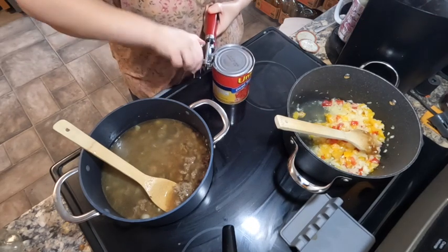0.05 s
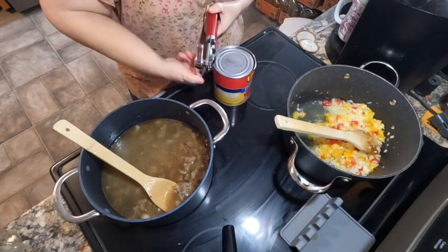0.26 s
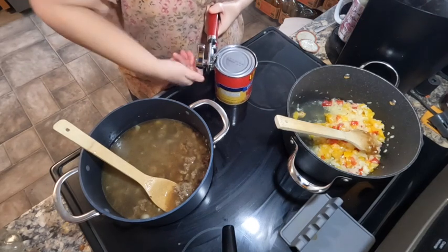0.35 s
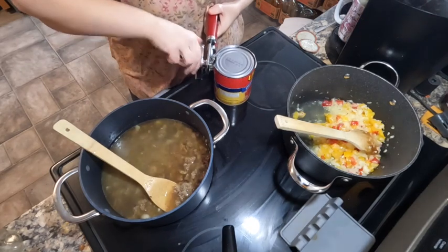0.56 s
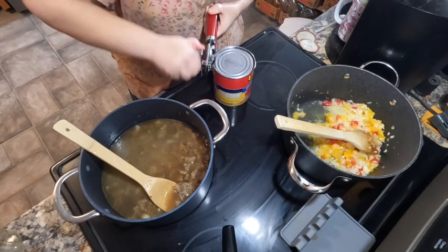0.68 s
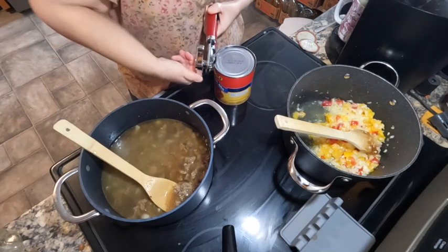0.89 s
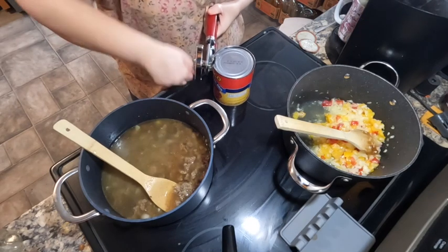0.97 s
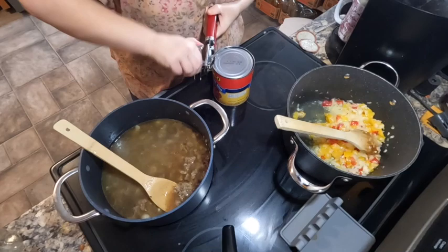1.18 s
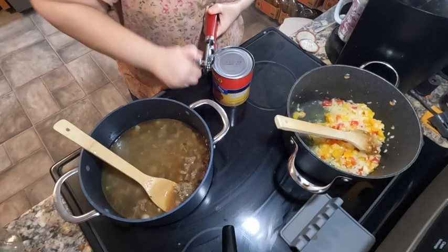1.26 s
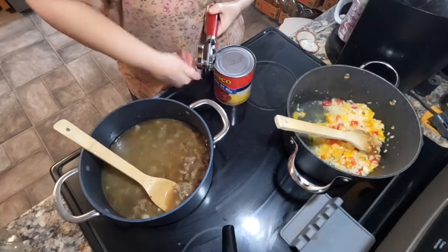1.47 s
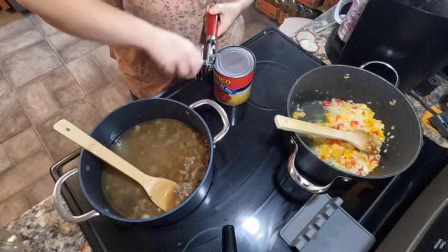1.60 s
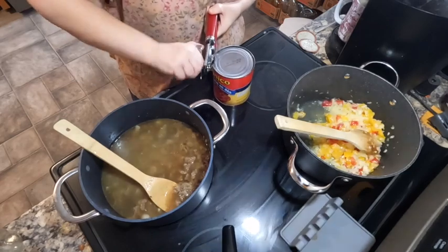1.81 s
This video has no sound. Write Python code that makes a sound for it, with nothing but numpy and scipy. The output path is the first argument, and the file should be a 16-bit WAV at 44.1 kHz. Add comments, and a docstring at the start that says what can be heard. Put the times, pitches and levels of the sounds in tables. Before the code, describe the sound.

A hand-cranked can opener bites round a large full tin on a glass hob: three short metallic grinds with sharp clicks and squeaks, over soft sizzle and low rumble, heard close in a small kitchen.

```python
"""A pan sizzles softly over a low kitchen rumble, then a hand-cranked can opener clicks and snaps.
It bites round the lid of a full tin can on a glass hob in three half turns.
Uneven slips, made as random jolts and hiss, shake the can body, ring the lid and grind at the wheel.
The lid squeaks as wavering sine tones; sizzle and rumble are filtered noise, with a short room tail."""
import sys
import numpy as np
from scipy import signal
from scipy.fft import rfft, irfft, next_fast_len
from scipy.io import wavfile
from scipy.ndimage import uniform_filter1d

SR = 44100
rng = np.random.default_rng(int(sys.argv[2]) if len(sys.argv) > 2 else 0)


def master(y):
    """Save y as 16-bit WAV."""
    cut = np.clip(np.atleast_2d(y).T, -1, 1)
    pcm = np.round(cut * 32767)  # scale
    wavfile.write(sys.argv[1], SR, pcm.astype(np.int16))


N = 81585  # length in samples


def amp(db):
    """Turns decibels into a plain gain."""
    return 10 ** (np.asarray(db) / 20)


def evened(x):
    """Scales a sound to an average (RMS) level of one."""
    return x / np.sqrt(np.mean(x ** 2) + 1e-20)


def read(points, hz):
    """Reads a curve between its points, along a logarithmic pitch scale."""
    point_hz, value = np.transpose(points)
    return np.interp(np.log(hz + 1), np.log(point_hz + 1), value)


def colour(x, points):
    """Filters a sound by a spectrum in dB."""
    size = next_fast_len(2 * x.shape[-1])
    gain = amp(read(points, np.fft.rfftfreq(size, 1 / SR)))
    return irfft(rfft(x, size) * gain, size)[..., :x.shape[-1]]


def ring(x, modes):
    """Metal struck by x: a sum of sine tones that die away, faster when the mode is wider."""
    t = np.arange(4096) / SR
    tap = np.zeros(4096)
    for hz, width_hz, db in modes:
        strength = amp(db) * np.sqrt(width_hz)
        tap += strength * np.exp(-np.pi * width_hz * t) * np.sin(2 * np.pi * hz * t)
    return signal.oaconvolve(x, tap / np.linalg.norm(tap))[:len(x)]


# spectrum of the sizzle and room air: pitch_hz, density_db (dB per Hz)
AIR_COLOUR = [(59, -66), (100, 2), (244, -10), (362, -20.5), (559, -18.5), (846, -28.5), (1130, -20),
              (1750, -30), (1900, -30.5), (2240, -26), (5580, -28.5), (14200, -55.5)]
# how alike the two sides are: pitch_hz, likeness (0 to 1)
AIR_LIKENESS = [(60, 1), (230, 0.98), (910, 0.76), (3530, 0.57), (13700, 0.9)]
AIR_DB, PATCH_DB = -45, 2.5  # overall level; unevenness of the patches


def air():
    """Sizzle and room air: patchy noise, partly alike on both sides."""
    frames, hz = N // 128 + 5, np.fft.rfftfreq(512, 1 / SR)
    a, b, c, d, patches = rng.standard_normal((frames, 257, 5)).T
    patches = uniform_filter1d(patches, 30, 0)  # smooth across pitch
    patches = evened(uniform_filter1d(patches, 8, 1))  # and across time
    same = np.clip(read(AIR_LIKENESS, hz), -1, 1)[:, None]
    left = a + 1j * b
    right = same * left + np.sqrt(1 - same ** 2) * (c + 1j * d)
    grid = np.array([left, right]) * amp(PATCH_DB * patches)
    noise = signal.istft(grid, nperseg=512, noverlap=384)[1][:, :N]
    return amp(AIR_DB) * evened(colour(noise, AIR_COLOUR))


# low rumble through the hob, midway between the sides: time_s, level_db
RUMBLE_LEVEL = [(0.0, -33.5), (0.086, -46.5), (0.252, -33), (0.276, -17), (0.328, -61), (0.349, -26),
                (0.674, -44.5), (0.782, -28), (1.082, -29.5), (1.122, -36.5), (1.256, -41), (1.458, -24.5),
                (1.484, -28), (1.57, -28.5), (1.606, -37.5), (1.678, -37.5), (1.71, -45), (1.85, -41.5)]
# spectrum of the rumble: pitch_hz, density_db (dB per Hz)
RUMBLE_SPECTRUM = [(8.8, -37), (15, 10), (54, 11), (135, -1.5), (170, -8.5), (220, -23), (265, -66)]


def rumble():
    """Low lumpy shaking through the hob: deep noise that swells and sinks."""
    a, b = rng.standard_normal((2, N))
    x = colour(np.array([a + 0.41 * b, a - 0.069 * b]), RUMBLE_SPECTRUM)
    slow_power = uniform_filter1d((x ** 2).mean(0), 3000)
    x = x / np.sqrt(abs(slow_power) + 1e-12)
    time_s, level_db = np.transpose(RUMBLE_LEVEL)
    side_db = np.array([[-1.], [1.]])  # a little stronger on the right
    return x * amp(np.interp(np.arange(N) / SR, time_s, level_db) + side_db)


# clicks and snaps of the gear and the cutter, with a faint treble spit of the pan among them, before the part
# levels below: # start_s, level_db, thud_db and treble_edge_db (both against level_db), slow_tail_t60_s (time
# to fall 60 dB)
SNAP_LIST = [(0.124, -32.5, 3, -15.5, 0.5), (0.2028, -28.5, 4, -21, 0.11), (0.2364, -42, -19, -23, 0.078),
             (0.253, -18.5, 5, -22, 0.041), (0.2798, -26, -2, -6.5, 0.098), (0.4207, -32, 7, -29, 0.097),
             (0.575, -58, -22.5, -8, 0.07), (0.654, -30.5, 7.5, -37, 0.39), (0.717, -41, 16, -16, 0.073),
             (0.7464, -42.5, 5, -3, 0.11), (0.769, -32.5, 19, -13, 0.13), (0.789, -10.5, -39, -4, 0.039),
             (0.82, -24.5, 11, -10, 0.14), (0.9724, -10.5, 2.5, -18.5, 0.098), (0.9925, -33, 12, -23, 0.21),
             (1.019, -31, 6.5, -28, 0.47), (1.234, -35.5, -1.5, -9.5, 0.094), (1.2418, -47, 17, -11, 0.15),
             (1.297, -35, 1, -13, 0.12), (1.3425, -21.5, -17, -29, 0.06),
             (1.4466, -13.5, -2.5, -20.5, 0.055), (1.493, -21.5, 4, -30, 0.088), (1.704, -58, 7, 10, 0.12)]
# spectra of the crack and of its treble edge: pitch_hz, density_db (dB per Hz)
CRACK_COLOUR = [(260, -44), (450, 2), (824, -4.5), (1170, 2.5), (1460, -6), (2520, -3), (3080, -8),
                (5000, -30), (6500, -26), (11000, -120)]
TICK_COLOUR = [(2650, -29), (4000, 5.5), (4700, -5), (6200, -6.5), (7930, -10), (8610, -23.5),
               (9700, -11.5), (14200, -30)]
# ringing modes of the can body, main lid, upper lid, rim and cutting wheel: pitch_hz, width_hz, level_db
BODY_MODES = [(274.4, 44, 4), (203, 90, -14), (312, 85, -2.5), (428.5, 55, 0.5), (549, 14, -7.5),
              (599.4, 17, -6), (867, 170, -5), (1050, 89, -14)]
LID_MODES = [(1065, 48, -2), (1230, 50, -4), (1295, 29, 9.5), (1330, 27, 0)]
UPPER_LID_MODES = [(1592, 63, 1.5), (1734, 25, 7.5)]
RIM_MODES = [(2096, 18, -5.5), (2567, 28, 2), (2875, 68, 1), (3005, 62, -2.5), (3256, 78, -2.5),
             (3590, 76, -6.5), (3816, 38, -11.5)]
CUTTER_MODES = [(4203, 120, 1.5), (4780, 82, -5), (5187, 70, -2.5), (5650, 94, -14), (6640, 90, -8.5),
                (7770, 66, -17), (9880, 330, -10)]
# the deep bass of the shudder and thud is thinned below about 160 Hz: pitch_hz, gain_db
BASS_CUT_GAIN = [(105, -8.5), (160, -1.5), (400, -0.38)]
CRACK_DB, TICK_DB, THUD_DB, RING_DB, SNAP_CUTTER_DB = -8.5, -5, -8, -14, -18
SNAP_RISE_S, FIRST_T60_S, AFTER_DB = .0007, 0.027, -8.5  # rise; first fall; level of the slow tail


def snaps():
    """A sharp crack, a slower rattle behind it, a thud into the body and a ring of lid, rim and wheel."""
    crack_noise, strike_noise = rng.standard_normal((2, N))
    envelopes, t = np.zeros((3, N)), np.arange(N) / SR
    for start_s, level_db, thud_db, edge_db, t60_s in SNAP_LIST:
        age = np.maximum(t - start_s, 0)
        rise = np.sin(np.pi / 2 * np.minimum(age / SNAP_RISE_S, 1)) ** 2
        fall = amp(-60 * age / FIRST_T60_S) + amp(AFTER_DB - 60 * age / t60_s)
        envelopes += rise * fall * amp(level_db + np.array([[0], [thud_db], [edge_db]]))
    main, thud, edge = envelopes
    crack = amp(CRACK_DB) * main * evened(colour(crack_noise, CRACK_COLOUR))
    tick = amp(TICK_DB) * edge * evened(colour(crack_noise, TICK_COLOUR))
    boom = amp(THUD_DB) * colour(ring(thud * strike_noise, BODY_MODES), BASS_CUT_GAIN)
    metal = amp(RING_DB) * ring(main * strike_noise, LID_MODES + UPPER_LID_MODES + RIM_MODES)
    wheel = amp(SNAP_CUTTER_DB) * ring(edge * strike_noise, CUTTER_MODES)
    return crack + tick + boom + metal + wheel


# one list for each half turn of the crank, relative levels before each part's own trims:
# time_s, main_lid_db, upper_lid_db, can_shudder_db, grinding_db, fine_scrape_db
HALF_TURNS = [
    [(0.186, -54, -68, -33.5, -68, -67), (0.2, -51, -64, -49, -54, -65), (0.216, -28, -49, -64, -35.5, -47),
     (0.242, -16, -50, -18, -39, -44.5), (0.258, -27, -27, -35, -29, -41), (0.272, -21, -34, -19, -38, -44),
     (0.282, -22, -32, -26, -30, -36), (0.294, -15, -38, -18.5, -39, -44),
     (0.316, -21, -34.5, -22, -30.5, -47), (0.362, -26, -42, -22, -40, -58),
     (0.41, -84.5, -57, -43.5, -52, -66), (0.428, -49, -50, -32.5, -50, -72),
     (0.442, -44, -56, -45, -54, -79), (0.52, -60, -74, -59, -77, -73)],
    [(0.7, -55, -70, -68, -67, -53), (0.714, -41, -76, -33.5, -68, -75), (0.746, -46, -70, -54, -51, -53.5),
     (0.776, -31, -55, -28.5, -30, -57), (0.78, -55, -61, -28, -74, -47), (0.79, -23, -37, -29.5, -44, -41),
     (0.802, -29, -24, -19, -55, -60), (0.814, -28, -56, -33.5, -31.5, -41),
     (0.844, -18, -41, -29, -25, -38), (0.892, -17, -31.5, -20.5, -32.5, -44.5),
     (0.914, -46, -62, -28.5, -39, -59), (0.946, -51, -55, -41, -48, -96), (0.964, -49, -50, -59, -53, -77)],
    [(1.284, -75, -77, -45, -74, -67), (1.312, -25, -51, -39.5, -43, -51),
     (1.338, -21, -50, -30, -39.5, -48), (1.356, -32, -36, -22, -27, -49),
     (1.386, -18.5, -36, -21.5, -31.5, -40), (1.404, -51, -66, -18.5, -31.5, -43),
     (1.426, -42, -29.5, -19.5, -38.5, -45), (1.452, -44, -38, -18, -32.5, -48),
     (1.472, -52, -58, -24.5, -41, -71), (1.5, -42, -44, -36, -66, -62), (1.528, -42, -67.5, -58, -68, -78),
     (1.554, -74, -56, -45, -62, -101), (1.6, -75, -64, -48.5, -60, -59)],
]
OFF_DB = -76  # each turn's level outside its own time span


def effort(column):
    """Gain over time from one column of the half turns, almost silent between them."""
    t, total = np.arange(N) / SR, np.zeros(N)
    for turn in HALF_TURNS:
        points = np.array(turn)
        total += amp(np.interp(t, points[:, 0], points[:, column], left=OFF_DB, right=OFF_DB))
    return total


def per_turn(db):
    """Gain over time from one dB value for each turn, gliding between their sixth points."""
    return amp(np.interp(np.arange(N) / SR, [turn[5][0] for turn in HALF_TURNS], db))


BASE_SLIPS_PER_S, SLIP_SPREAD_DB, HISS_SHARE = 500, 4.5, 0.52  # rate before the rate factor


def slips(rate_factor):
    """Stick-slip of the wheel: uneven small jolts with some friction hiss."""
    draw = rng.random((N, 3))
    size_db = SLIP_SPREAD_DB * np.minimum(-np.log(draw[:, 0] + 1e-9), 4)
    size = amp(size_db) * np.sign(draw[:, 1] - .5)
    jolts = size * (draw[:, 2] < rate_factor * BASE_SLIPS_PER_S / SR)
    return evened(jolts) + HISS_SHARE * rng.standard_normal(N)


def steady(x):
    """Evens the slow level of a sound so that the crank sets it."""
    return x / np.sqrt(abs(uniform_filter1d(x ** 2, 700)) + 1e-9)


CHATTER_DB, CHATTER_S = 4.5, .006  # depth per unit of the random wave; smoothing time


def chatter():
    """The wheel grips and frees the metal: a random gain that wavers every few milliseconds."""
    wave = evened(uniform_filter1d(rng.standard_normal(N), round(CHATTER_S * SR)))
    return evened(amp(CHATTER_DB * np.clip(wave, -3, 1.5)))


# deepest mode of the full can: pitch_hz, width_hz, level_db
LOWEST_MODE = [(176.8, 13, 0)]
# deepest mode against the can shudder, one value per turn: level_db
LOWEST_TURN_DB = [-6.5, -10, -3.5]


def body_shudder(low):
    """Slow slips shake the can body, with its deepest mode rung twice for a narrower tone."""
    deepest = steady(ring(ring(low, LOWEST_MODE), LOWEST_MODE))
    shudder = steady(ring(low, BODY_MODES)) + per_turn(LOWEST_TURN_DB) * deepest
    return colour(shudder, BASS_CUT_GAIN) * uniform_filter1d(effort(column=3), 300)


# lower against higher of the two upper lid modes, one value per turn: tilt_db (added to one, taken off the other)
UPPER_LID_TILT = [-10, -5, 11]
MAIN_LID_DB = -6.0


def lid_ring(both):
    """Slow and fast slips ring the lid, whose main modes chatter."""
    tilt = np.sqrt(per_turn(UPPER_LID_TILT))  # the square root halves the dB
    upper = tilt * ring(both, UPPER_LID_MODES[:1]) + ring(both, UPPER_LID_MODES[1:]) / tilt
    main = steady(ring(both, LID_MODES)) * effort(column=1) * amp(MAIN_LID_DB) * chatter()
    return main + steady(upper) * effort(column=2)


# rim rasp against the grinding, one value per turn: level_db
RIM_RASP_DB = [-3, -5.5, 0]
# spectrum of the grinding scrape: pitch_hz, density_db (dB per Hz)
SCRAPE_COLOUR = [(350, -17), (600, 6.5), (716, -29), (1320, 3.5), (1920, -19), (2550, -52), (5000, -32),
                 (6500, -60), (11000, -120)]


def grinding(fine, teeth):
    """Slips rasp along the ringing rim and scrape as filtered noise."""
    strength = effort(column=4)
    rasp = per_turn(RIM_RASP_DB) * ring(evened(teeth) * strength, RIM_MODES) * chatter()
    return rasp + strength * evened(colour(fine, SCRAPE_COLOUR))


# spectrum of the fine scrape: pitch_hz, density_db (dB per Hz)
FINE_COLOUR = [(2650, -9), (4500, -2), (7970, -8.5), (8730, -52), (10500, -24), (13000, -33), (14200, -63)]
CUTTER_DB, FINE_DB = -2.5, -4


def cutting_wheel(teeth, dust):
    """The fastest slips ring the cutting wheel and leave a fine treble scrape."""
    strength = effort(column=5)
    wheel = amp(CUTTER_DB) * ring(evened(teeth + dust) * strength, CUTTER_MODES)
    return wheel + amp(FINE_DB) * strength * evened(colour(dust, FINE_COLOUR))


def cranking():
    """Four streams of slips, from sparse to dense, drive the body, lid, rim and wheel."""
    low, teeth, fine = steady(slips(0.97)), steady(slips(2.5)), steady(slips(6.7))
    dust = slips(12.)
    lid = lid_ring(steady(low + fine))
    return body_shudder(low) + lid + grinding(fine, teeth) + cutting_wheel(teeth, dust)


# short squeaks of the lid where the wheel catches, before waver and chatter:
# start_s, length_s (until the fall begins), level_db, pitch_hz
SQUEAK_LIST = [(0.201, 0.012, -29.5, 1290), (0.212, 0.025, -31.5, 1300), (0.256, 0.011, -24.5, 1290),
               (0.279, 0.019, -19.5, 1300), (0.336, .016, -25, 1300), (0.355, 0.017, -30.5, 1300),
               (0.79, 0.015, -23, 1240), (0.819, 0.0049, -21.5, 1310), (0.832, 0.0043, -17, 1310),
               (0.844, 0.016, -18.5, 1317), (0.868, 0.011, -21, 1320), (0.885, 0.012, -17, 1320),
               (0.934, 0.012, -41, 1300), (0.948, 0.012, -38.5, 1300), (1.311, 0.011, -31.5, 1630),
               (1.339, 0.036, -26, 612), (1.339, 0.019, -26, 1300), (1.364, 0.048, -30.5, 1590)]
SQUEAK_RISE_S, SQUEAK_FALL_S, WOBBLE = 0.0022, 0.002, 0.042  # wobble: typical share of the pitch


def squeaks():
    """Wavering sine tones that start and stop within a few milliseconds."""
    t, out = np.arange(N) / SR, np.zeros(N)
    waver = 1 + WOBBLE * evened(uniform_filter1d(rng.standard_normal(N), 120))
    wavering_time = np.cumsum(waver) / SR
    for start_s, length_s, level_db, pitch_hz in SQUEAK_LIST:
        rise = np.clip((t - start_s) / SQUEAK_RISE_S, 0, 1)
        fall = np.exp(-np.maximum(t - start_s - length_s, 0) / SQUEAK_FALL_S)
        tone = np.sqrt(2) * np.sin(2 * np.pi * pitch_hz * wavering_time)
        out += amp(level_db) * rise * fall * tone
    return out * np.sqrt(chatter())


# left minus right level: pitch_hz, difference_db
LEFT_LEAN = [(60, -5), (120, -4), (230, 1.5), (460, 0.5), (910, 2.0), (1790, 2), (3530, -1.5), (6960, -0.5),
             (13700, 1)]
# how far the left side leads: pitch_hz, phase_radians
LEFT_LEAD = [(330, -0.12), (690, -1.07), (1120, 0.38), (1460, -1.38), (1810, -0.35), (3010, -0.83),
             (6550, -0.49), (13900, -1.2)]


def two_sides(x):
    """Spreads the can over left and right by a level and phase difference at each pitch."""
    size = next_fast_len(2 * N)
    hz = np.fft.rfftfreq(size, 1 / SR)
    half = amp(read(LEFT_LEAN, hz) / 2) * np.exp(.5j * read(LEFT_LEAD, hz))
    return irfft(rfft(x, size) * np.array([half, 1 / half]), size)[:, :N]


# how fast the kitchen echo dies: pitch_hz, t60_s (time to fall 60 dB)
KITCHEN_T60 = [(100, 0.14), (500, 0.27), (2000, 0.23), (8000, 0.25)]
# strength of the kitchen echo: pitch_hz, level_db
KITCHEN_LEVEL = [(100, 2.5), (200, -29.5), (700, -7), (3000, -10.5), (6000, -7), (13000, -13)]


def kitchen(x):
    """Room echo: sparse taps of random sign, each band dying at its own speed."""
    taps = np.zeros((2, SR // 2))
    slots = np.arange(100, SR // 2 - 20, 20)
    places = slots + rng.integers(0, 20, (2, len(slots)))
    np.put_along_axis(taps, places, rng.choice([-1., 1.], places.shape), 1)
    hz, t, bands = signal.stft(taps, SR, nperseg=256)
    decay = amp(-60 * t / read(KITCHEN_T60, hz)[:, None])
    tail = signal.istft(bands * decay, SR, nperseg=256)[1]
    tail = tail / np.linalg.norm(tail[0])
    return signal.fftconvolve(colour(x, KITCHEN_LEVEL)[None], tail, axes=1)[:, :N]


def scene():
    """The can, direct and echoed, with the sizzle and the rumble."""
    can = snaps() + cranking() + squeaks()
    return air() + rumble() + two_sides(can) + kitchen(can)


EDGE_HZ = 14150


def record(dry):
    """Limits the band: a steep filter takes away the treble above the edge."""
    low_pass = signal.firwin(511, EDGE_HZ, window=("kaiser", 9), fs=SR)
    return signal.oaconvolve(dry, low_pass[None], "same")


dry = scene()
out = record(dry)
master(out)
```